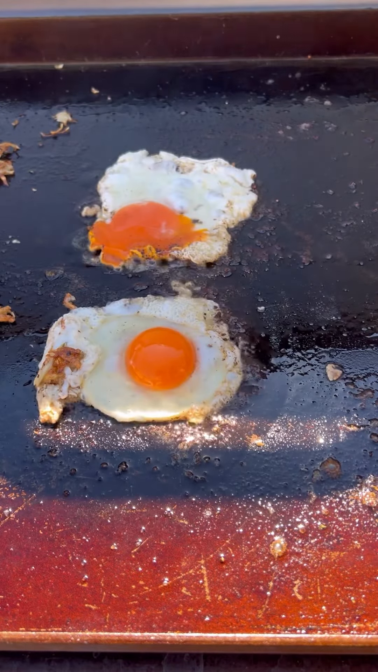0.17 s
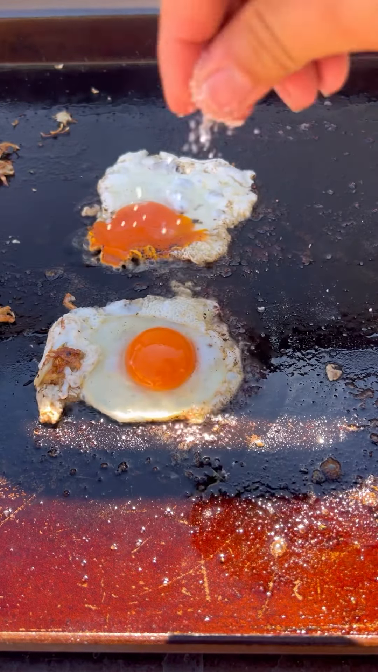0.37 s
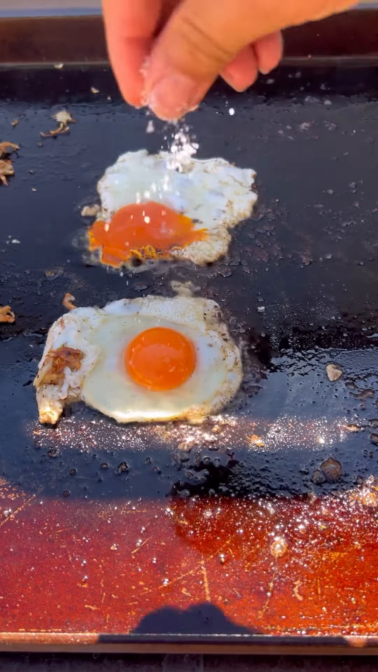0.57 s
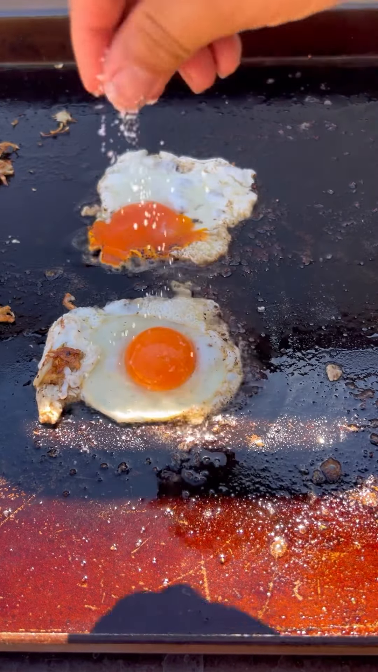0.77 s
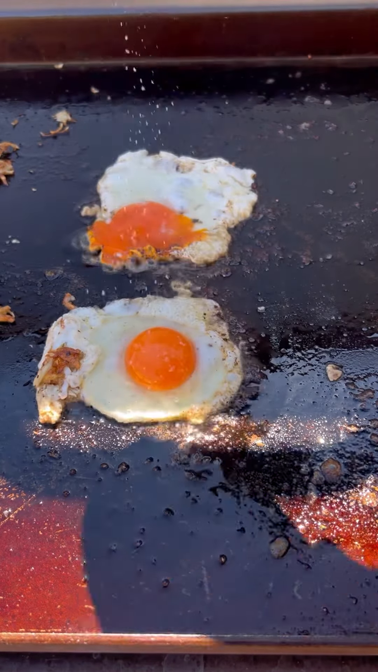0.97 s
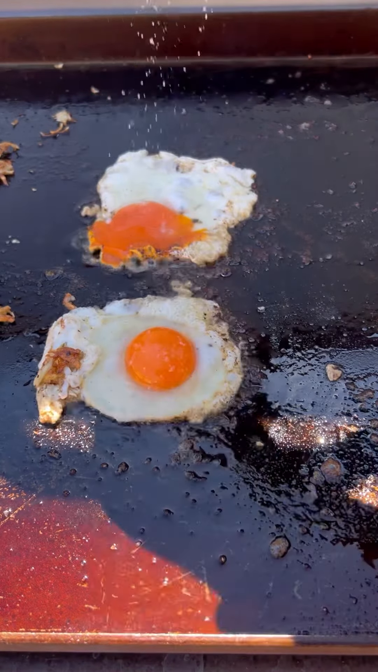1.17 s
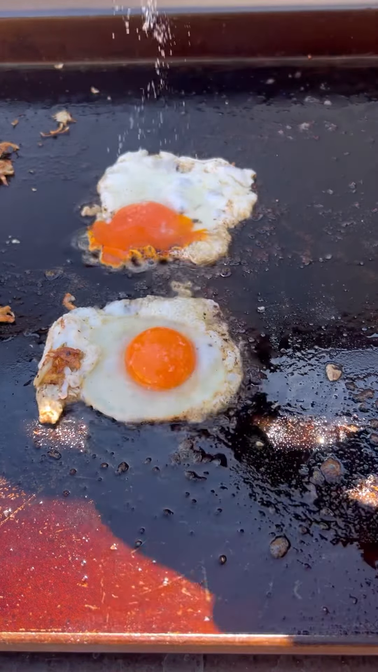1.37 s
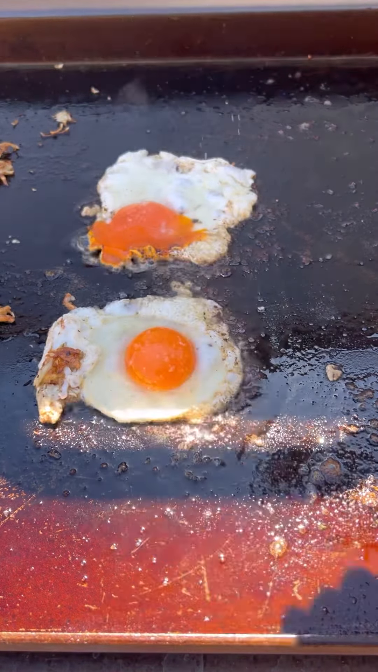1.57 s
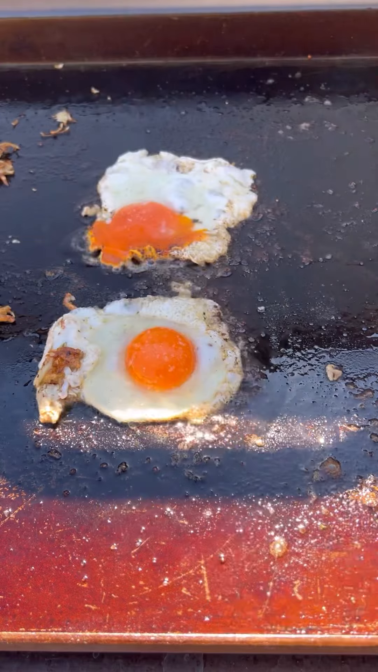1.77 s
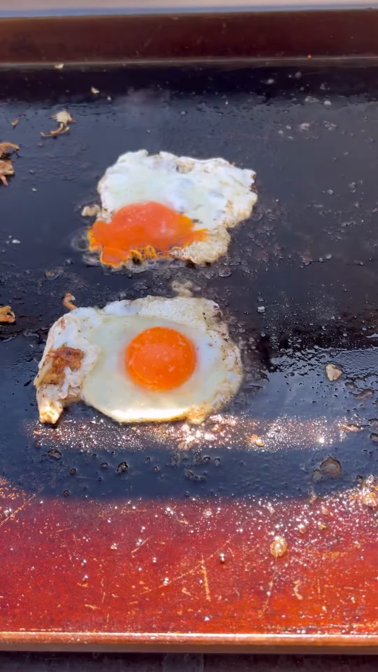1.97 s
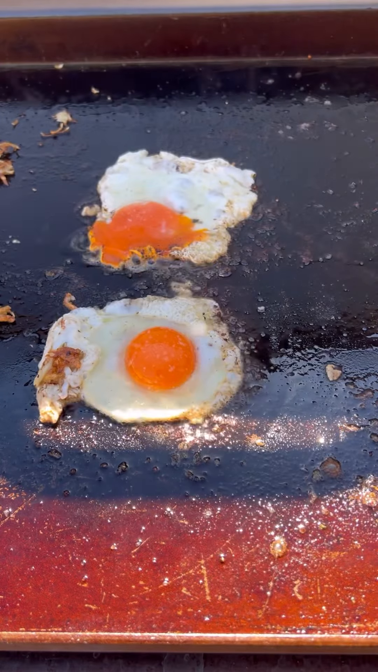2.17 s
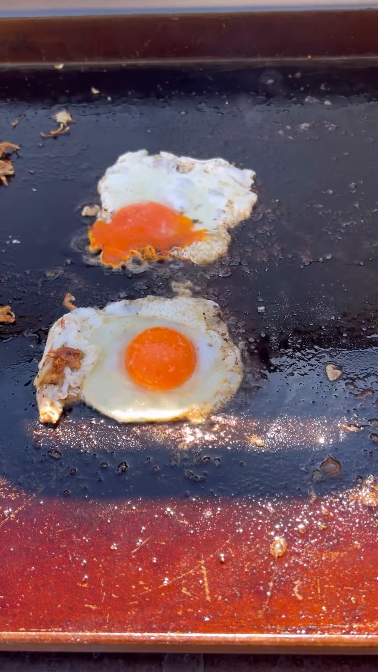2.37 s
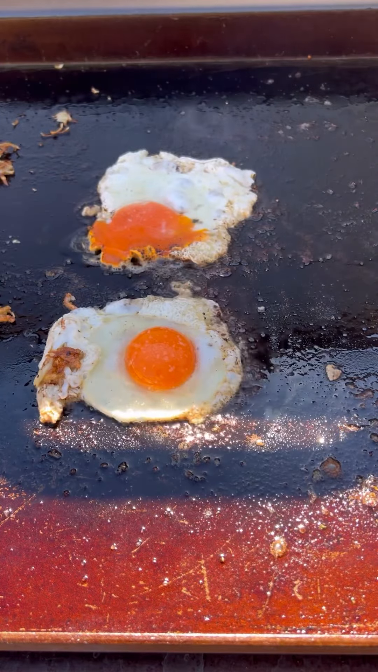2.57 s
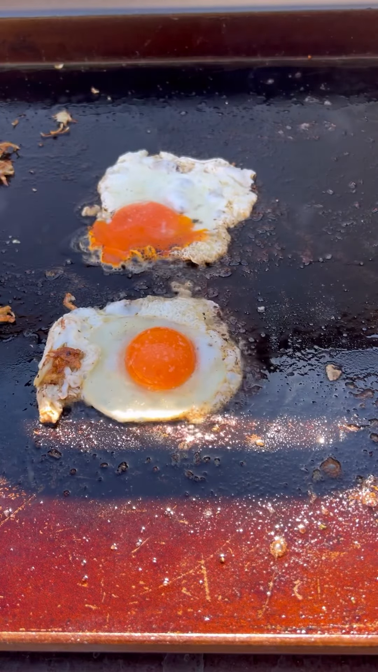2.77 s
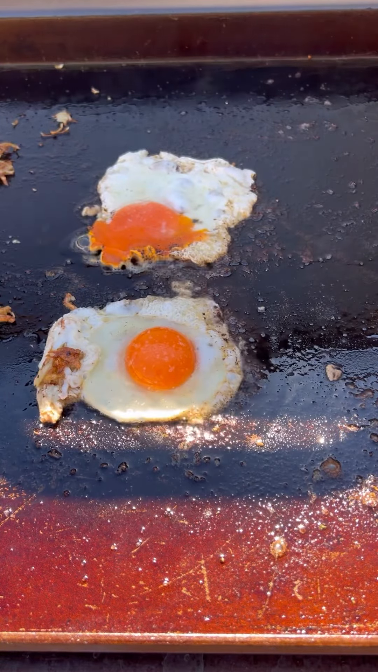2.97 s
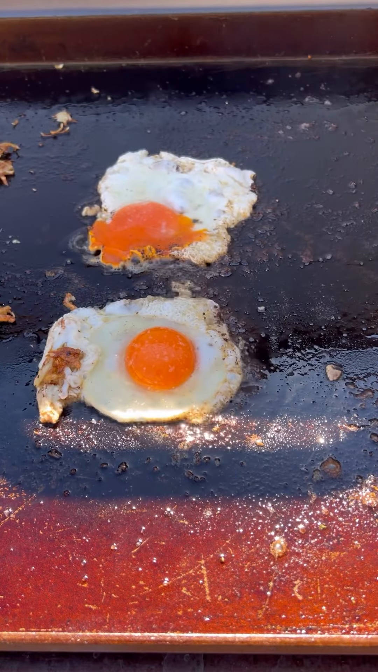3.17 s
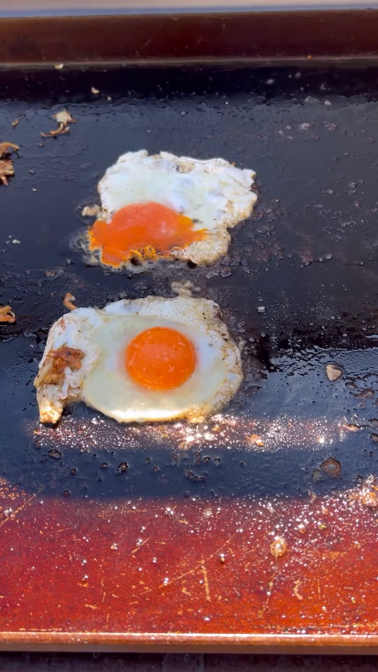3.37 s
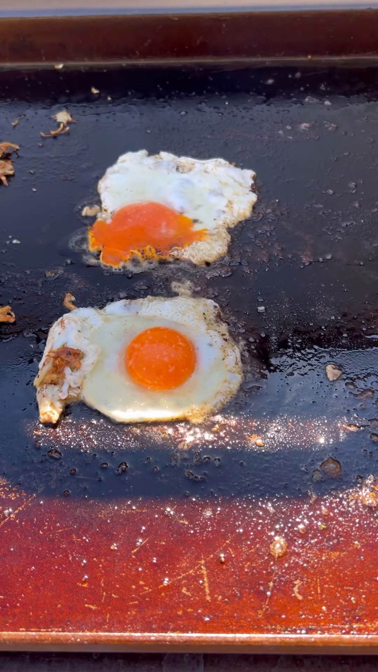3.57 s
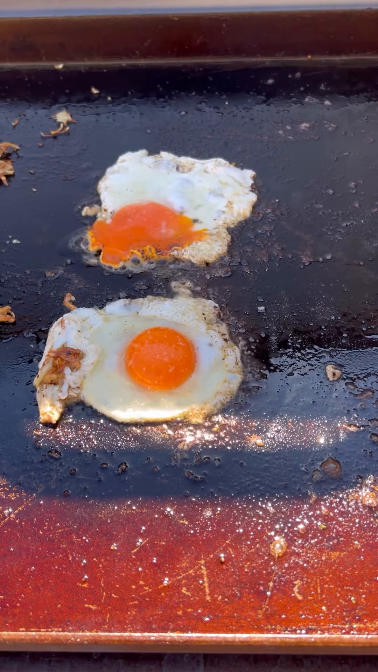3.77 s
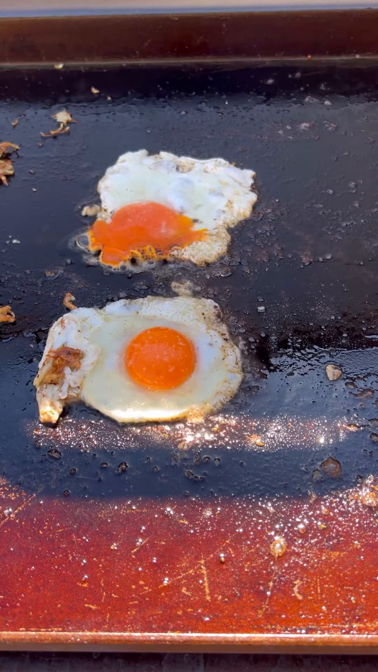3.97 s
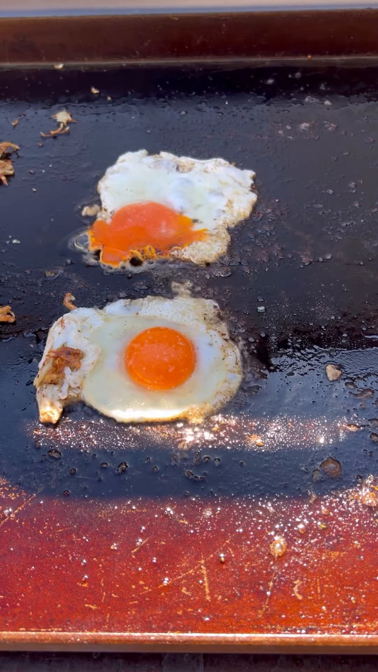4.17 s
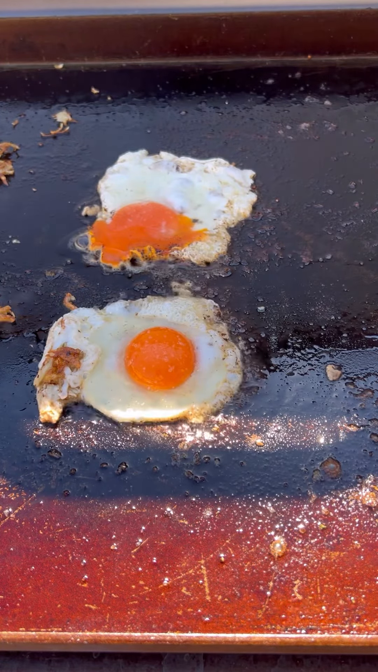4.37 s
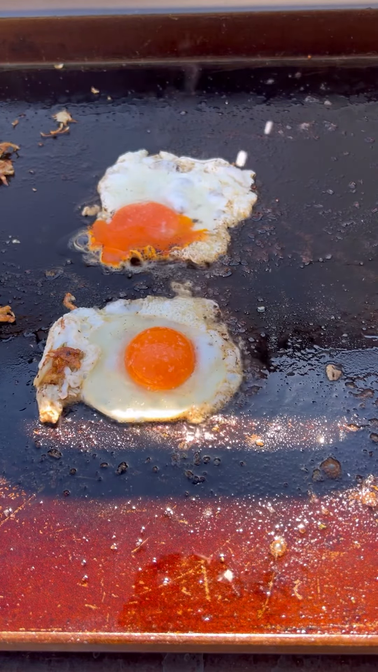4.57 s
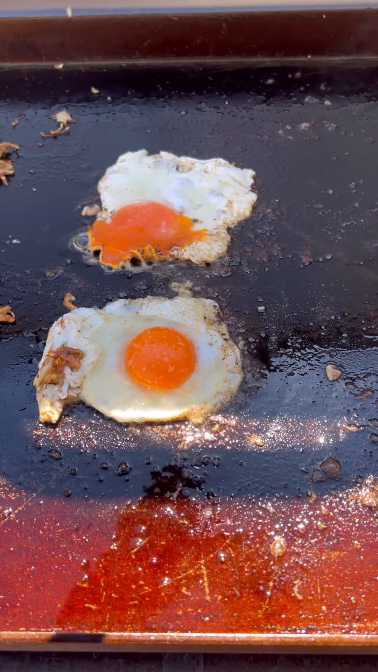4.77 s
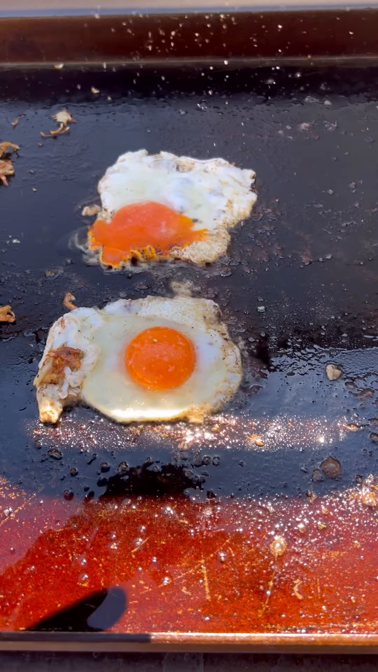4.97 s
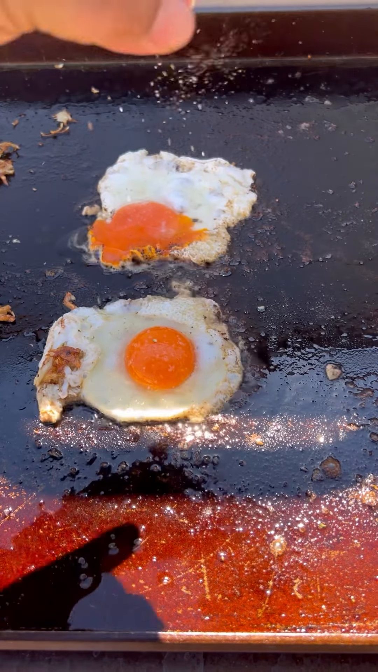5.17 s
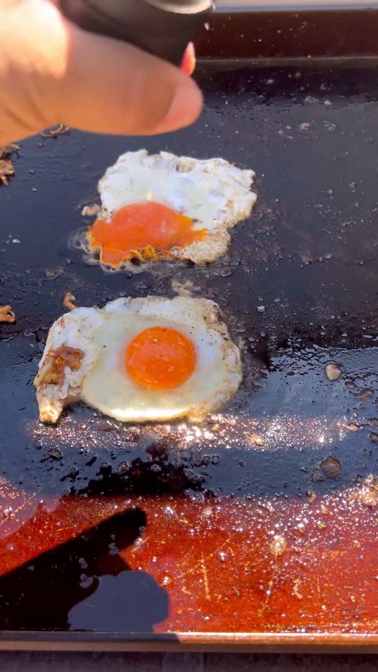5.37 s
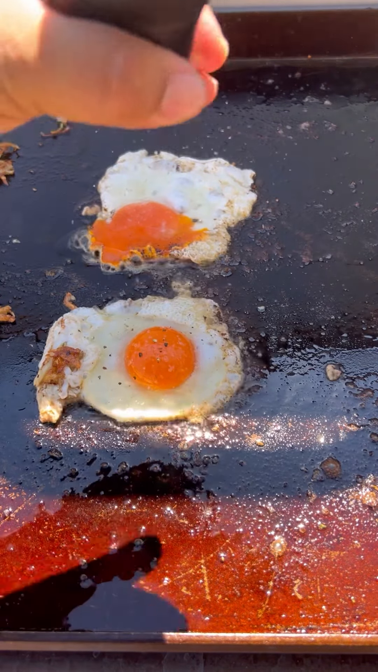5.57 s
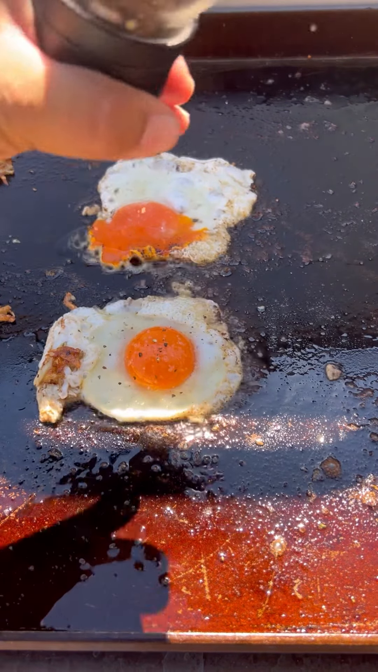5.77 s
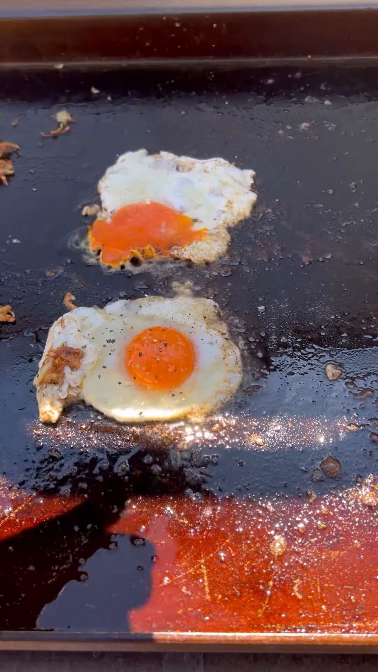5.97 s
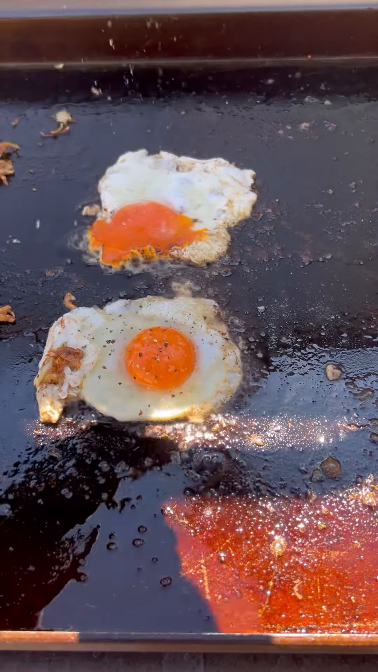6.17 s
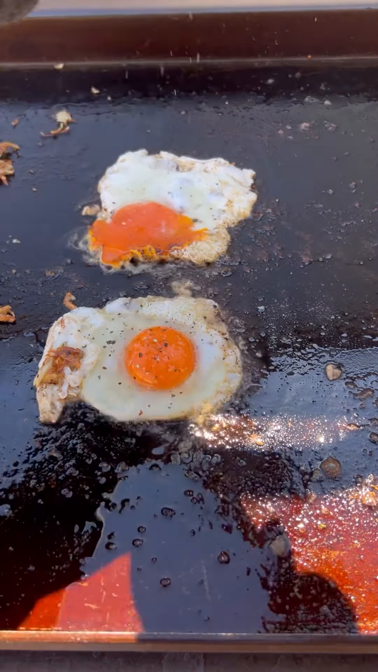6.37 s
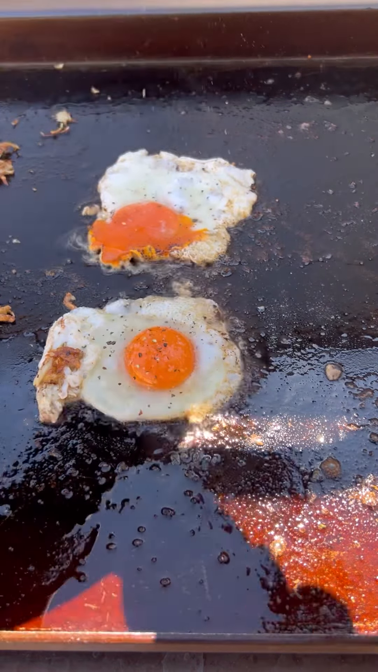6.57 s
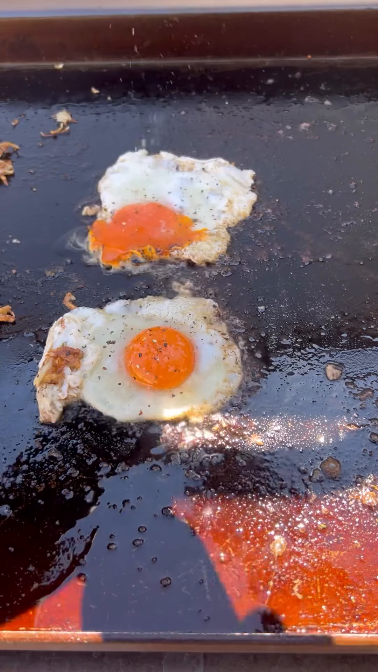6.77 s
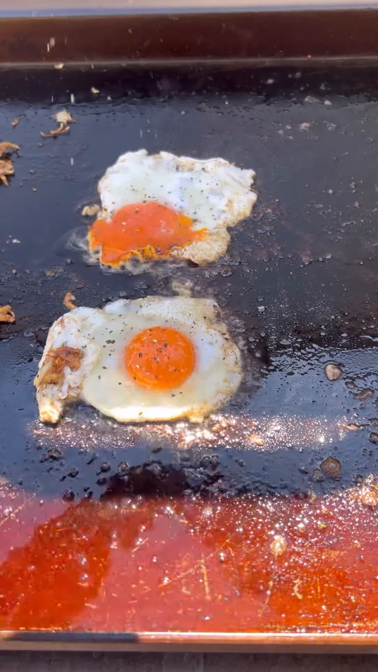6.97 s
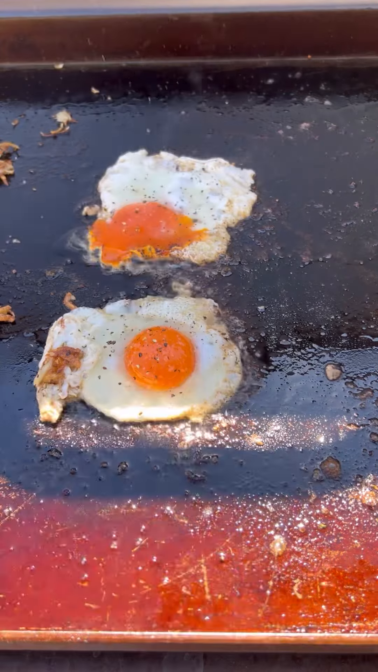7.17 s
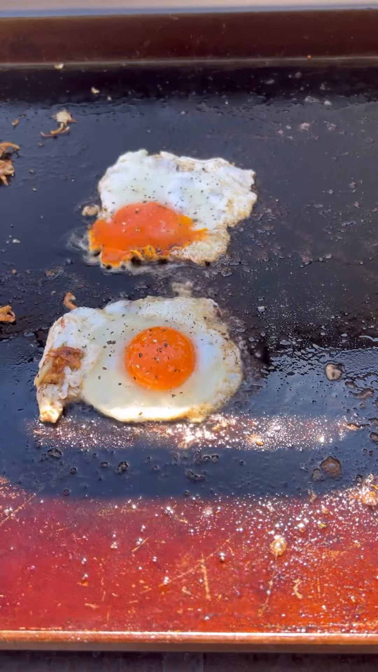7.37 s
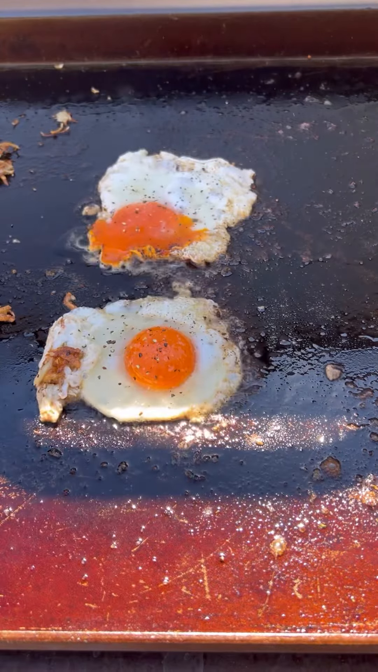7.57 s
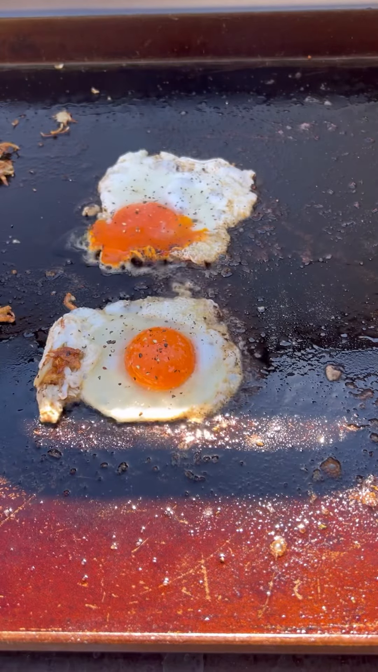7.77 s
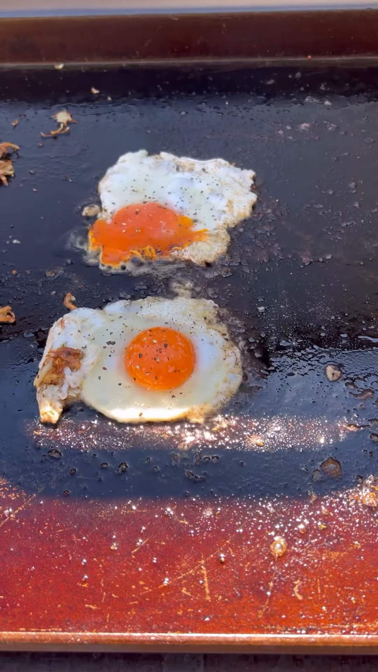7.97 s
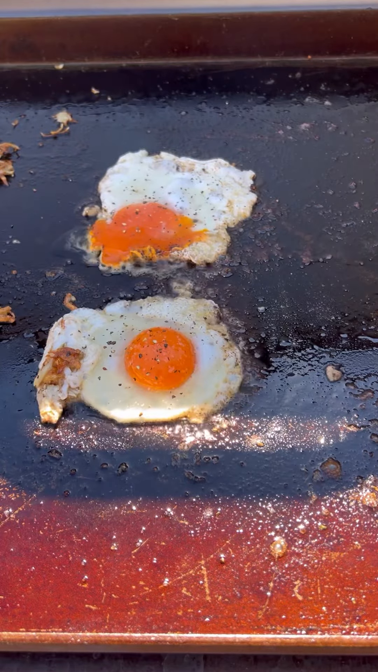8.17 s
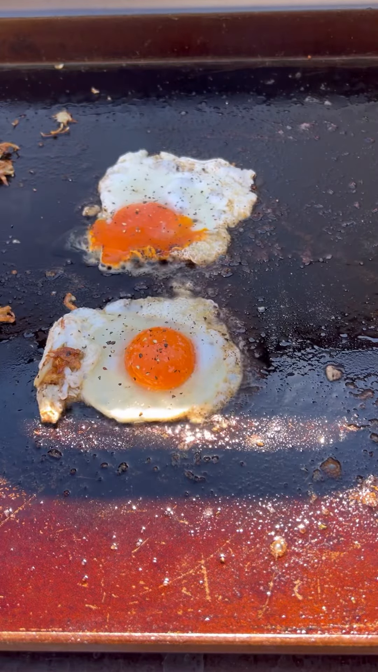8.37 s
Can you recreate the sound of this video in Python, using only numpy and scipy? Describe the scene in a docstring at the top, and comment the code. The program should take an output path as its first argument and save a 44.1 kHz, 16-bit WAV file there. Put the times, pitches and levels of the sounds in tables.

```python
"""Two eggs fry on a steel griddle outdoors: fat hisses, steam bubbles spit and pop.
Over the griddle a pepper mill is twisted in short strokes: corns rustle, crunch and crack in its
hollow body. Nearby, things are set down with dull thuds, the first after a short drag, and a double
bump reaches the stereo microphone directly. Underneath, the burner rumbles in a dull background rush."""
import sys
import numpy as np
from scipy import signal
from scipy.fft import rfft, irfft, next_fast_len
from scipy.io import wavfile

SR = 44100
rng = np.random.default_rng(int(sys.argv[2]) if len(sys.argv) > 2 else 0)


def master_out(mix):
    """Clip the mix to full scale and print it as 16-bit PCM to the path in sys.argv[1]."""
    frames = np.transpose(np.atleast_2d(mix))
    ceiling = np.clip(frames, -1, 1)
    pcm = np.round(ceiling * 32767).astype(np.int16)
    wavfile.write(sys.argv[1], SR, pcm)


N = 370572

# The steady sound at the griddle: (time [s], sizzle [dB], burner rumble [dB], background rush [dB])
GRIDDLE_LEVELS = [(0, -38.5, -51, -50.5), (1.0, -39.5, -52, -52), (1.9, -39, -48.5, -52),
                  (2.7, -39.5, -51.5, -51), (3.4, -39.5, -49, -53), (4.0, -37.5, -51, -54),
                  (4.6, -38, -53.5, -53), (4.9, -36.5, -45, -47.5), (5.4, -36.5, -47.5, -53.5),
                  (5.85, -38.5, -59, -53), (6.3, -37.5, -50.5, -59), (6.8, -35, -47.5, -47),
                  (6.95, -37, -54, -58), (7.5, -37, -53.5, -50.5), (8.4, -38.5, -50, -54)]
# Colour of the hot fat: (frequency [Hz], level [dB])
SIZZLE_SPECTRUM = [(500, -13), (1000, -4), (2440, -2.5), (3300, -4.5), (5300, -4), (6000, 1.5),
                   (6800, -1.5), (7900, 2), (10000, 0), (11200, -4), (13200, -7.5), (13700, -3),
                   (15600, -5.5)]
def sizzle(level_db):
    """Fat hisses on the griddle; steam bubbles spit in clumps, each in a pitch range of its own."""
    hiss = rng.standard_normal((2, N)) * amp(1.2 * drift(11.3))
    clumps = amp(5.6 * drift(25))
    spits = 0
    for hz in np.geomspace(900, 15000, 9):
        bubbles = grains(140 * clumps, spread_db=3.5, most=5.2)
        spits += rms_one(resonance(bubbles, hz, .5 * hz)) * np.sqrt(hz)
    return amp(level_db) * coloured(hiss + amp(-5.0) * rms_one(spits), SIZZLE_SPECTRUM)


# Loud pops in the fat: (time [s], peak [dB], pitch [Hz], fall below [dB/octave], fall above [dB/octave])
FAT_POPS = [(0.0175, -19, 8800, 9, 9), (0.0638, -25, 8800, 9, 36), (0.147, -23, 9700, 9, 12),
            (0.1525, -24, 8800, 12, 9), (0.2021, -20, 7900, 18, 36), (0.207, -33, 1900, 24, 0),
            (0.2369, -19, 8800, 9, 27), (0.2516, -20, 8800, 9, 15), (0.3966, -28, 8800, 9, 12),
            (0.4579, -30, 5900, 3, 21), (0.5111, -22, 11800, 9, 0), (0.5563, -24, 4800, 24, 9),
            (0.5752, -33, 1300, 15, 0), (0.6117, -24, 8800, 21, 18), (0.6433, -25, 7200, 9, 12),
            (0.8273, -20, 9700, 6, 12), (0.9275, -21, 6500, 15, 15), (0.9334, -22, 13100, 9, 0),
            (0.9465, -25, 7200, 12, 18), (0.9728, -27, 8800, 15, 9), (1.036, -15, 7200, 18, 36),
            (1.0565, -25, 9700, 9, 0), (1.0923, -26, 9700, 9, 3), (1.2438, -26, 7900, 9, 15),
            (1.2519, -23, 8800, 9, 12), (1.3402, -28, 9700, 12, 3), (1.3848, -25, 4800, 12, 21),
            (1.4247, -22, 13100, 12, 0), (1.4483, -24, 4800, 12, 18), (1.5899, -26, 8800, 21, 9),
            (1.6502, -27, 8800, 21, 6), (1.7865, -25, 1400, 21, 0), (1.8172, -31, 2600, 9, 9),
            (1.9127, -22, 8800, 9, 15), (1.973, -31, 1400, 21, 0), (1.9789, -24, 8800, 9, 6),
            (2.1045, -28, 3900, 12, 0), (2.3033, -21, 7900, 21, 12), (2.4424, -27, 13100, 9, 0),
            (2.4886, -15, 8800, 12, 18), (2.5032, -17, 7200, 3, 12), (2.5464, -23, 9700, 15, 15),
            (2.568, -21, 8800, 12, 18), (2.5946, -23, 2400, 15, 0), (2.6476, -26, 9700, 12, 0),
            (2.6871, -17, 8800, 12, 9), (2.7751, -27, 13100, 6, 0), (2.795, -27, 8800, 6, 12),
            (2.8307, -22, 8800, 15, 27), (2.8516, -27, 8800, 9, 36), (2.8869, -19, 10700, 12, 0),
            (2.9079, -16, 7900, 27, 21), (2.9136, -21, 2400, 15, 3), (2.9412, -24, 8800, 6, 15),
            (2.9995, -19, 13100, 9, 0), (3.1044, -16, 8800, 15, 15), (3.1588, -19, 8800, 15, 12),
            (3.1964, -23, 9700, 18, 12), (3.3881, -25, 8800, 15, 24), (3.4326, -20, 7900, 6, 9),
            (3.5627, -23, 8800, 18, 18), (3.5877, -26, 7200, 9, 24), (3.637, -44, 1800, 0, -6),
            (3.6903, -24, 7900, 9, 27), (3.739, -13, 7900, 27, 36), (3.7495, -26, 7900, 6, 27),
            (3.759, -26, 7900, 12, 0), (3.7848, -22, 13100, 3, 0), (3.8244, -25, 5300, 12, 18),
            (4.088, -14, 8800, 12, 18), (4.1707, -22, 7900, 12, 33), (4.2163, -24, 4300, 9, 0),
            (4.4935, -23, 8800, 21, 0), (4.5342, -27, 7900, 6, 12), (4.5767, -25, 7200, 9, 12),
            (7.3511, -23, 7900, 15, 6), (7.4866, -21, 8800, 12, 21), (7.5218, -21, 8800, 9, 33),
            (7.5645, -19, 7200, 21, 18), (7.8457, -47, 1200, -3, -6), (7.8781, -18, 7200, 9, 21),
            (8.0532, -22, 8800, 15, 15), (8.0803, -46, 1200, -6, -6), (8.1313, -21, 7200, 15, 0),
            (8.3772, -21, 6500, 27, 9)]
def pops():
    """Larger bubbles burst and splash, with small ones at random in between."""
    out = np.zeros((2, N))
    small = chance_clicks(per_s=12, level_db=np.full(N, -32), spread_db=3.0,
                          hz=np.full(N, 9000), octaves=1.4)
    for s, *click in FAT_POPS + small:
        add_registers(out, s, snap(tail_db=-15.5, t60=0.013), register_peaks(*click))
    return out


# Twists of the mill, forth and back:
# (time [s], hold [s], rustle of corns [dB], crunch in the burr [dB], grip on the housing [dB])
MILL_STROKES = [(4.295, 0.035, -30.5, -42, -62), (4.353, 0.022, -35, -39.5, -40),
                (4.687, 0.022, -39, -28, -44), (4.74, 0.045, -40, -34, -38), (4.873, 0.09, -30.5, -60, -50),
                (5.003, 0.043, -22.5, -22, -31.5), (5.114, 0.041, -27.5, -57, -52),
                (5.25, 0.013, -24.5, -39, -56), (5.288, 0.0061, -32.5, -38, -40),
                (5.325, 0.021, -24, -26, -33.5), (5.379, 0.005, -28.5, -32, -42),
                (5.459, 0.045, -31, -57, -60), (5.57, 0.038, -28, -55, -53), (5.617, 0.02, -29, -24, -37),
                (5.641, 0.051, -33, -30, -43), (5.747, 0.023, -29, -46, -49),
                (5.892, 0.025, -29.5, -62, -53), (5.953, 0.081, -26.5, -25.5, -36),
                (6.089, 0.079, -30, -49, -49), (6.232, 0.011, -25, -30, -43.5),
                (6.281, 0.029, -27, -27, -39.5), (6.354, 0.1, -31, -65, -62),
                (6.518, .015, -28.5, -31, -45), (6.537, 0.018, -28, -24, -35),
                (6.567, 0.012, -34, -31.5, -59), (6.62, 0.033, -23, -61, -58), (6.716, .03, -31, -52, -40),
                (6.761, 0.011, -24.5, -26, -34.5), (6.786, 0.04, -24, -35, -40),
                (6.873, 0.031, -21.5, -54, -64), (7.055, 0.044, -26.5, -37.5, -58),
                (7.364, 0.036, -34, -44, -53)]
def stroke_levels():
    """Rustle, crunch and grip in dB: each twist rises, sags while it holds, then falls."""
    t, power = np.arange(0, N, 44) / SR, 1e-12
    slopes_db_per_s = [(288, 900, 802), (27, 53, 49), (475, 548, 400)]   # each: rustle, crunch, grip
    rise, sag, fall = np.array(slopes_db_per_s)[:, :, None]
    for s, hold, *levels_db in MILL_STROKES:
        loss_db = rise * np.maximum(s - t, 0) + sag * np.clip(t - s, 0, hold)
        loss_db += fall * np.maximum(t - s - hold, 0)
        power = power + amp(np.array(levels_db)[:, None] - loss_db) ** 2
    return [np.interp(np.arange(N) / SR, t, 10 * np.log10(p)) for p in power]


# Resonances of the mill's hollow body: (frequency [Hz], width [Hz], gain [dB])
MILL_MODES = [(615, 420, -29), (1067, 123, 2.5), (1375, 220, -2.5), (1820, 430, 0.5), (2950, 240, -1),
              (3930, 360, 0)]
# Bright ring of the corns: (frequency [Hz], width [Hz], gain [dB])
CORN_MODES = [(3070, 1000, -8.5), (4220, 590, 4.5), (5340, 2200, -0.5), (7190, 1130, 9.5), (8500, 1820, 4),
              (10430, 1650, 0.5)]
# Corns that crack: (time [s], peak [dB], pitch [Hz], fall below [dB/octave], fall above [dB/octave])
CORN_CRACKS = [(4.6833, -13, 4300, 12, 9), (4.6971, -12, 13100, 6, 0), (4.7521, -19, 4800, 9, 18),
               (4.7798, -10, 7200, 9, 15), (4.7852, -20, 2600, 21, 9), (4.8892, -14, 8800, 15, 30),
               (4.9242, -23, 8800, 6, 36), (4.9952, -16, 8800, 12, 36), (5.0026, -15, 3900, 3, 12),
               (5.0073, -9, 8800, 3, 30), (5.0299, -8, 3900, 27, 12), (5.0357, -8, 7200, 6, 36),
               (5.0458, -14, 5300, 12, 6), (5.055, -14, 3500, 15, 18), (5.0658, -20, 1200, 27, 0),
               (5.0913, -13, 7900, 18, 36), (5.1427, -10, 8800, 15, 36), (5.1494, -13, 8800, 21, 36),
               (5.159, -16, 8800, 21, 36), (5.2876, -6, 8800, 6, 24), (5.2954, -5, 7900, 6, 36),
               (5.3125, -11, 3200, 12, 6), (5.3247, -12, 5300, 6, 15), (5.3339, -15, 3500, 6, 18),
               (5.3431, -16, 1200, 24, 3), (5.3617, -17, 8800, 6, 36), (5.379, -18, 8800, 0, 36),
               (5.3855, -24, 8800, 3, 36), (5.4496, -5, 7900, 30, 30), (5.4662, -15, 8800, 21, 36),
               (5.4778, -7, 7900, 21, 36), (5.4834, -18, 8800, 9, 36), (5.5216, -17, 7200, 18, 9),
               (5.5537, -11, 7900, 27, 36), (5.6061, -10, 4300, 6, 6), (5.6442, -17, 7200, 6, 36),
               (5.6495, -10, 7900, 21, 36), (5.6584, -17, 5900, 9, 33), (5.6735, -2, 7200, 12, 24),
               (5.7177, -26, 5300, 6, 12), (5.7632, -7, 8800, 15, 36), (5.7682, -18, 8800, 15, 36),
               (5.7814, -16, 8800, 12, 27), (5.7869, -22, 8800, 15, 21), (5.8201, -26, 10700, 15, 3),
               (5.8347, -20, 8800, 12, 18), (5.8541, -29, 8800, 3, 33), (5.8825, -15, 7900, 21, 36),
               (5.8884, -18, 8800, 27, 36), (5.9057, -23, 7900, 6, 30), (5.9281, -9, 7200, 27, 36),
               (5.9434, -12, 8800, 3, 24), (5.9574, -12, 6500, 3, 15), (5.9764, -5, 7200, 24, 21),
               (5.9814, -6, 7900, 6, 27), (5.9955, -10, 7900, 12, 30), (6.0044, -9, 7900, 9, 36),
               (6.0106, -14, 2400, 6, 12), (6.0264, -14, 7900, 3, 30), (6.0336, -12, 4800, 9, 27),
               (6.1003, -11, 7900, 27, 27), (6.1189, -18, 7900, 12, 3), (6.1501, -34, 1300, 9, 3),
               (6.1713, -31, 1300, 21, 3), (6.207, -17, 8800, 18, 36), (6.2366, -21, 3500, 9, 15),
               (6.2654, -15, 8800, 21, 24), (6.2772, -10, 7900, 6, 27), (6.2816, -7, 8800, 6, 33),
               (6.3881, -18, 8800, 18, 36), (6.4986, -15, 7200, 21, 36), (6.5376, -7, 7900, 9, 24),
               (6.5441, -11, 8800, 9, 36), (6.5813, -8, 7900, 12, 36), (6.6129, -14, 8800, 21, 27),
               (6.6224, -13, 8800, 12, 36), (6.6344, -15, 8800, 18, 36), (6.6402, -7, 7900, 24, 36),
               (6.6496, -22, 8800, 6, 24), (6.685, -21, 8800, 12, 9), (6.7569, -11, 1400, 24, 9),
               (6.7672, -15, 8800, 3, 36), (6.8039, -10, 7900, 15, 36), (6.8637, -7, 7900, 24, 36),
               (6.879, -9, 8800, 21, 36)]
# Level of each register of a crack, lowest first: (offset [dB])
CRACK_REGISTER_DB = (-2.5, -0.6, 0.1, -1.5, -1.6, -1.9, -2.3)
def pepper_mill():
    """Over the griddle, crushing rings the hollow body, corns rustle and single ones crack through."""
    rustle_db, crunch_db, grip_db = stroke_levels()
    crushing = grains(2500 * amp(6.0 * drift(40)), spread_db=4.0)
    crunch = rms_one(body(crushing, MILL_MODES))
    jostling = grains(3500 * amp(5.5 * drift(40)), spread_db=2.5)
    rustle = rms_one(resonance(body(jostling, CORN_MODES), hz=6200, width_hz=7600))
    grip = rms_one(narrow(rng.standard_normal((2, N)), hz=256, width_hz=377))
    out = amp(crunch_db) * crunch + amp(rustle_db) * rustle + amp(grip_db) * grip
    pitch_hz = np.where(crunch_db > rustle_db - 6, 3500, 7000)   # deeper while the burr bites
    small = chance_clicks(per_s=15, level_db=rustle_db + 3.5, spread_db=2, hz=pitch_hz, octaves=0.89)
    for s, *click in CORN_CRACKS + small:
        puff = snap(tail_db=-13, t60=0.017)
        crack = body(puff, MILL_MODES + CORN_MODES) + amp(-10.5) * puff
        add_registers(out, s, crack, register_peaks(*click) + CRACK_REGISTER_DB)
    return out


# Things set down nearby: (time [s], body peak [dB], tilt [dB/octave], top [dB re body],
# decay length [factor], rise [s], echo [dB re body], extra weight under 120 Hz [dB])
SET_DOWNS = [(2.281, -28, -0.5, 5.5, 0.071, 0.0012, -39, .1), (2.364, -36, 18, -1.5, 0.17, 0.0083, -31, .1),
             (3.027, -17.5, 5.5, -2, 0.84, 0.00095, -19.5, 8.5),
             (3.078, -18.5, 7, -6, 0.55, 0.0028, -14.5, 8), (4.347, -28, 17, 1, 0.49, 0.0044, -18, .1),
             (7.545, -34, 11.5, -23, 0.3, .003, -26, .1), (7.785, -40, 6, -24, 0.92, 0.0033, -20, 2),
             (7.957, -16.5, 5.5, -7, 0.51, 0.0071, -12, 2)]
# Low body of a thud: (frequency [Hz], level [dB], t60 before the length factor [s])
THUD_LOW_BANDS = [(59.5, 1, 0.47), (90, 3, 0.56), (152.4, -11.5, 0.58), (206, -1, 1), (268.7, 1, 0.81),
                  (359, 0.5, 0.64), (495, -5, 0.43), (746, -13.5, 0.34)]
# Top of a thud: (frequency [Hz], level [dB], t60 before the length factor [s])
THUD_TOP_BANDS = [(1230, 12, 0.35), (1350, 11, 0.56), (1760, 16.5, 0.22), (2480, -17, 0.085)]
def thuds():
    """Things land near the microphone: noise dies band by band, the lows last and with a long echo."""
    out, t = np.zeros((2, N)), np.arange(SR) / SR
    echo_t60_s, echo_rise_s = 2.15, 0.27
    echo = amp(-60 * t / echo_t60_s) * np.minimum(t / echo_rise_s, 1)
    for s, peak_db, tilt_db, top_db, length, rise, echo_db, weight_db in SET_DOWNS:
        attack = np.minimum(t / max(rise, .001), 1)
        parts = (THUD_LOW_BANDS, peak_db, amp(echo_db) * echo), (THUD_TOP_BANDS, peak_db + top_db, 0)
        for bands, level_db, tail in parts:
            noise, sound = rng.standard_normal((2, SR)), 0
            for hz, db, t60 in bands:
                gain = amp(db + tilt_db * np.log2(hz) + weight_db * (hz < 120))
                decay = amp(-60 * t / (t60 * length)) + tail / (1 + (hz / 600) ** 4)
                sound += rms_one(narrow(noise, hz, 0.48 * hz)) * gain * decay
            add(out, s, sound * attack, level_db)
    return out


# A short drag before the first thud: (time [s], ring [Hz], level [dB])
DRAG_PATH = [(2.205, 945, -48), (2.229, 815, -45), (2.234, 725, -31), (2.255, 563, -35.5),
             (2.278, 360, -34)]
def drag():
    """Something drags nearby: a narrow band of noise sinks in pitch, with a fainter rasp above."""
    hz, level_db = in_time(DRAG_PATH)
    noise = rng.standard_normal((3, 2, N))
    slow = signal.lfilter([1], [1, -2 * .975, .975 ** 2], noise[:2])
    phase = 2 * np.pi * np.cumsum(hz) / SR
    ring = rms_one(slow[0] * np.cos(phase) + slow[1] * np.sin(phase))
    rasp = rms_one(narrow(noise[2], hz=2200, width_hz=1100))
    return amp(level_db) * (ring + amp(-5.0) * rasp)


# Bumps right on the microphone: (time [s], peak [dB], start pitch [Hz], end pitch [Hz], t60 [s])
MICROPHONE_BUMPS = [(5.182, -12, 330, 67.6, 0.11), (5.229, -22.5, 150, 70, 0.12)]
def bumps():
    """A soft push on the microphone's housing: a few cycles that fall in pitch."""
    out, t = np.zeros((2, N)), np.arange(SR // 4) / SR
    attack = np.minimum(t / 0.004, 1) ** 2
    for s, peak_db, start_hz, end_hz, t60 in MICROPHONE_BUMPS:
        hz = end_hz + (start_hz - end_hz) * np.exp(-t / 0.0054)
        wave = -np.sin(2 * np.pi * np.cumsum(hz) / SR) * amp(-60 * t / t60) * attack
        add(out, s, np.array([wave, wave]), peak_db)
    return out


# Colour of the burner: (frequency [Hz], level [dB])
BURNER_SPECTRUM = [(13, -40), (22, -52), (45, -2), (70, 4), (130, -6), (200, -5.5), (300, -47), (500, -38)]
def burner(level_db):
    """The burner rumbles under the griddle: low noise whose level wavers."""
    return amp(level_db + 3.4 * drift(7.4)) * coloured(rng.standard_normal((2, N)), BURNER_SPECTRUM)


# Colour of the outdoor background: (frequency [Hz], level [dB])
RUSH_SPECTRUM = [(120, 3), (220, 0.5), (400, 2.5), (700, -1.5), (1100, -6), (1600, -12), (3000, -27)]
def rush(level_db):
    """A dull rush behind the griddle, gently swelling and sinking."""
    return amp(level_db + 2.0 * drift(5.2)) * coloured(rng.standard_normal((2, N)), RUSH_SPECTRUM)


# Bands that pops and cracks are split into: (low edge [Hz], high edge [Hz])
CLICK_REGISTERS = [(350, 700), (700, 1600), (1600, 2800), (2800, 4500), (4500, 7000), (7000, 11000),
                   (11000, 15600)]
def add_registers(out, s, sound, peaks_db):
    """Mixes in a click, each register at its own peak; signs alternate so that neighbours join."""
    for k, (edges, peak_db) in enumerate(zip(CLICK_REGISTERS, peaks_db)):
        band = signal.butter(3, edges, "band", fs=SR, output="sos")
        add(out, s, (-1) ** k * signal.sosfilt(band, sound), peak_db)


def register_peaks(peak_db, hz, below_db, above_db):
    """Peaks of a click's registers in dB: they fall away on both sides of its pitch."""
    octaves = np.log2(np.sqrt(np.prod(CLICK_REGISTERS, axis=1)) / hz)
    return peak_db + below_db * np.minimum(octaves, 0) - above_db * np.maximum(octaves, 0)


def snap(tail_db, t60, size=1500):
    """One sharp click of either sign, then a weaker puff of noise."""
    sound = rng.standard_normal((2, size)) * amp(tail_db - 60 * np.arange(size) / SR / t60)
    sound[:, 0] = rng.choice([-1, 1], 2)
    return sound


def chance_clicks(per_s, level_db, spread_db, hz, octaves):
    """Rows of small clicks at random moments, scattered in size, pitch and breadth."""
    gap, size, pitch, breadth = rng.random((400, 4)).T
    s = np.cumsum(-np.log(gap)) / per_s
    i = np.minimum(s * SR, N - 1).astype(int)
    peak_db = level_db[i] + spread_db * np.minimum(-np.log(size), 2)
    fall_db = 12 + 18 * breadth
    rows = np.transpose([s, peak_db, hz[i] * 2 ** (octaves * (pitch - .5)), fall_db, fall_db])
    return list(rows[(s < N / SR - .01) & (level_db[i] > -45)])


def grains(per_s, spread_db, most=6.8):
    """Random clicks, many small and a few large; the two rows share moments and sizes, not signs."""
    sizes = (rng.random(N) < per_s / SR) * amp(spread_db * np.minimum(rng.exponential(1, N), most))
    return sizes * rng.choice([-1, 1], (2, N)) + 1e-18


def drift(rate):
    """A slow random wander of spread 1."""
    r = np.exp(-80 * np.pi * rate / SR)
    slow = signal.lfilter([1], [1, -2 * r, r * r], rng.standard_normal(N // 40 + 2002))[2000:]
    return np.interp(np.arange(N) / 40, np.arange(len(slow)), rms_one(slow))


def resonance(x, hz, width_hz):
    """One resonance with gain 1 at its peak."""
    r = np.exp(-np.pi * width_hz / SR)
    poles = [1, -2 * r * np.cos(2 * np.pi * hz / SR), r * r]
    return signal.lfilter([(1 - r * r) / 2, 0, (r * r - 1) / 2], poles, x)


def narrow(x, hz, width_hz):
    """A resonance applied twice: steep skirts."""
    return resonance(resonance(x, hz, width_hz), hz, width_hz)


def body(x, modes):
    """Rings parallel resonances of alternating sign."""
    return sum((-1) ** k * amp(db) * resonance(x, hz, width) for k, (hz, width, db) in enumerate(modes))


def coloured(x, spectrum):
    """Filters x by a spectrum; rms 1."""
    size = next_fast_len(N)
    gain = amp(at_hz(spectrum, np.fft.rfftfreq(size, 1 / SR)))
    return rms_one(irfft(rfft(x, size) * gain, size)[:, :N])


def add(out, s, sound, peak_db):
    """Mixes a sound in at time s, with row 0 peaking at peak_db."""
    i = round(s * SR)
    out[:, i:i + sound.shape[1]] += (amp(peak_db) * sound / np.abs(sound[0]).max())[:, :N - i]


def in_time(rows):
    """Columns as curves, silent outside the table."""
    s, *columns = np.transpose(rows)
    return [np.interp(np.arange(N) / SR, s, c, left=-120, right=-120) for c in columns]


def at_hz(points, hz):
    points = np.array(points)
    return np.interp(np.log(hz + 1), np.log(points[:, 0] + 1), points[:, 1])


def amp(db):
    return 10 ** (np.asarray(db) / 20)


def rms_one(x):
    return x / np.sqrt(np.mean(x ** 2) + 1e-20)


# How far the microphone's left port leads the right: (frequency [Hz], phase [rad])
LEFT_LEAD = [(30, -0.04), (100, -0.08), (200, -0.22), (320, -0.5), (500, -0.75), (800, -0.6), (1300, -0.1),
             (4820, 0.0), (5430, -0.7), (6980, -1.3), (10300, -1.2), (16400, -2.0)]
# How much louder the left port is: (frequency [Hz], level [dB])
LEFT_GAIN = [(100, 0), (400, 1.5), (740, 0), (1200, -1.3), (2000, 0.3), (5500, 0.8), (9000, 0)]
def stereo(pair, likeness):
    """Likeness weighs row 0 (mid) against row 1 (side); the two ports differ in phase and level."""
    size = next_fast_len(N + SR)
    hz = np.fft.rfftfreq(size, 1 / SR)
    alike, lead = np.clip(at_hz(likeness, hz), 0, 1), at_hz(LEFT_LEAD, hz)
    mid, side = rfft(pair, size) * np.sqrt([1 + alike, 1 - alike]) / np.sqrt(1 + alike * np.cos(lead))
    turn = np.exp(.5j * lead) * amp(at_hz(LEFT_GAIN, hz) / 2)
    return irfft([(mid + side) * turn, (mid - side) / turn], size)[:, :N]


# Stereo width of sizzle, burner and rush, wider in the treble: (frequency [Hz], left-right likeness [0-1])
STEADY_LIKENESS = [(60, 0.98), (200, 1), (450, 1), (750, 0.79), (1200, 0.92), (1700, 1), (4400, 1),
                   (5400, 0.94), (8500, 0.73), (15000, .7)]
# Stereo width of the short nearby sounds: (frequency [Hz], left-right likeness [0-1])
EVENT_LIKENESS = [(60, .999), (250, .99), (500, .9), (900, .75), (1500, .93), (2800, .92), (3900, .95),
                  (5200, .75), (7000, .82), (15000, .58)]
def scene():
    """The steady frying and the short sounds around it, heard from one microphone position."""
    sizzle_db, rumble_db, rush_db = in_time(GRIDDLE_LEVELS)
    background = burner(rumble_db) + rush(rush_db)
    steady = sizzle(sizzle_db) + background
    events = pops() + pepper_mill() + thuds() + drag() + bumps()
    return stereo(steady, STEADY_LIKENESS) + stereo(events, EVENT_LIKENESS)


def record(dry):
    """The highest peaks are rounded and the top of the treble is cut."""
    cutoff_hz = 15780
    rounded = dry / (1 + np.abs(dry) ** 4) ** .25
    return signal.sosfilt(signal.ellip(10, .3, 75, cutoff_hz, fs=SR, output="sos"), .95 * rounded)


dry = scene()
out = record(dry)
master_out(out)
```